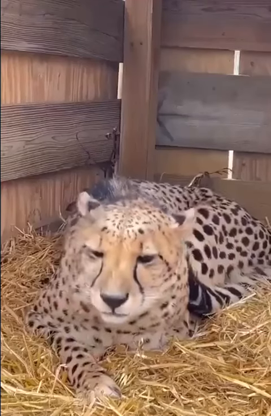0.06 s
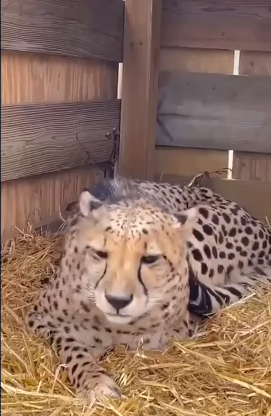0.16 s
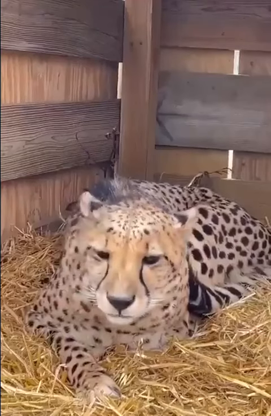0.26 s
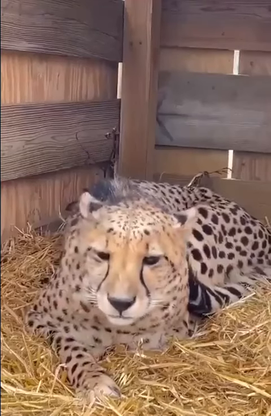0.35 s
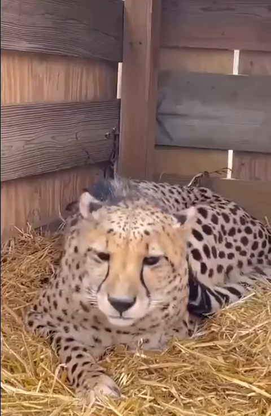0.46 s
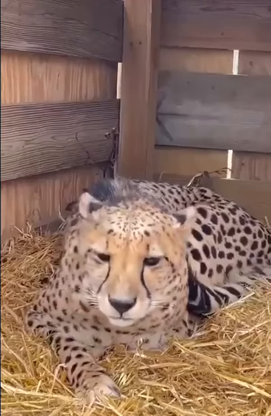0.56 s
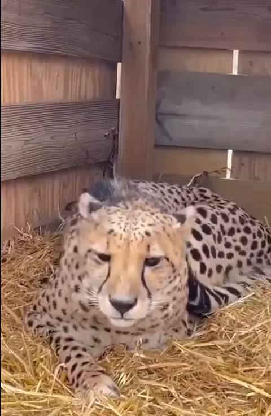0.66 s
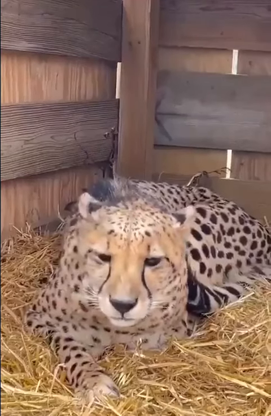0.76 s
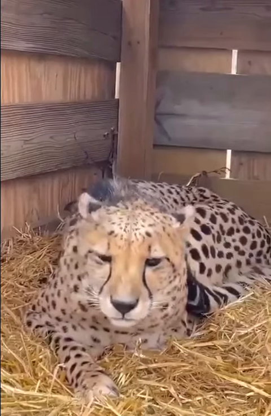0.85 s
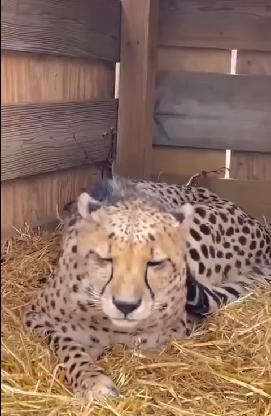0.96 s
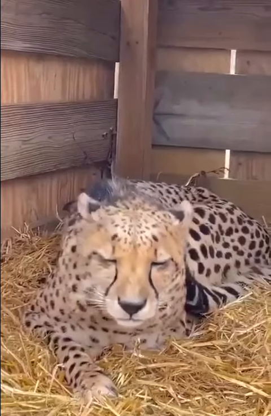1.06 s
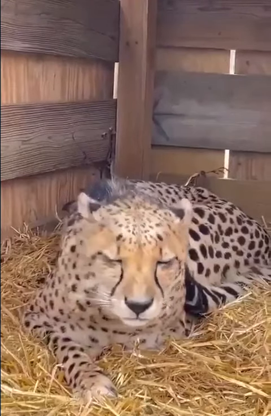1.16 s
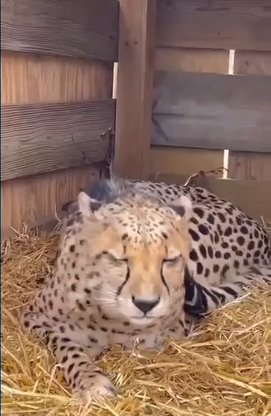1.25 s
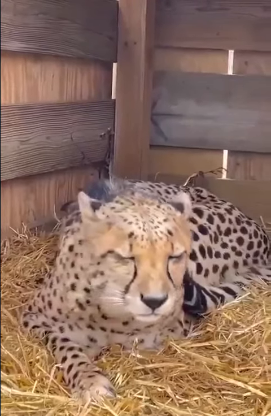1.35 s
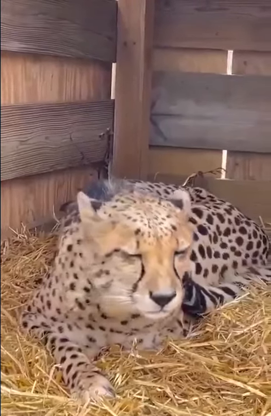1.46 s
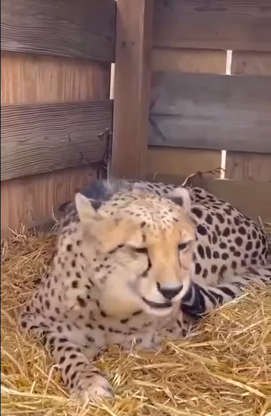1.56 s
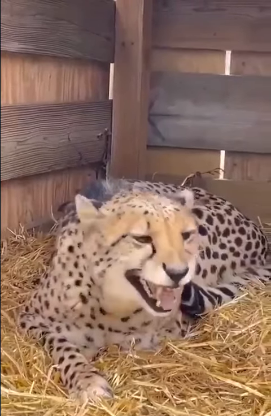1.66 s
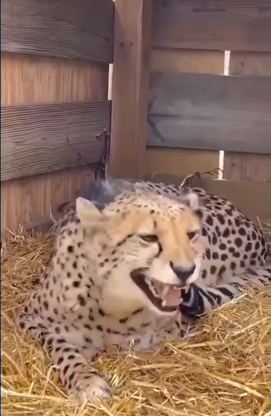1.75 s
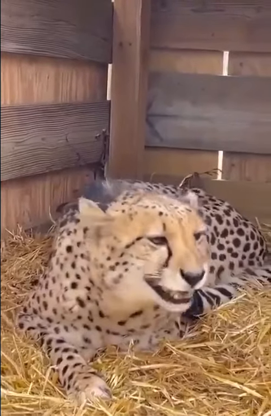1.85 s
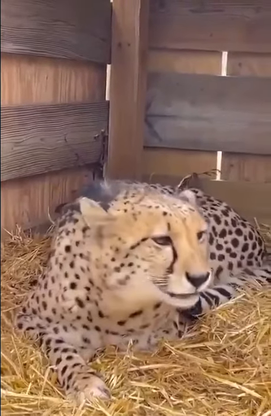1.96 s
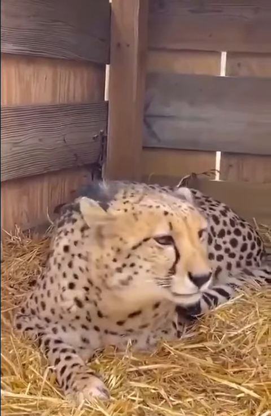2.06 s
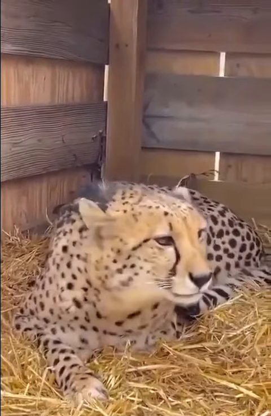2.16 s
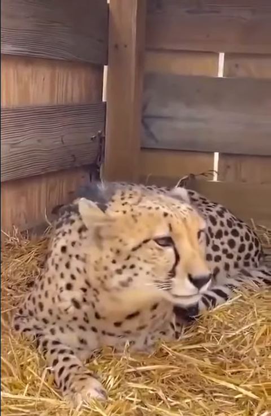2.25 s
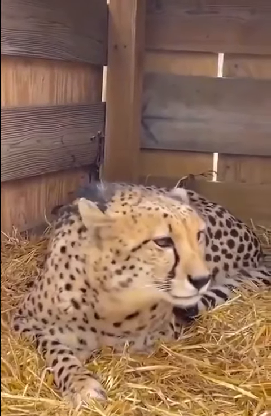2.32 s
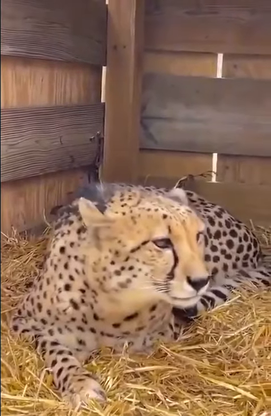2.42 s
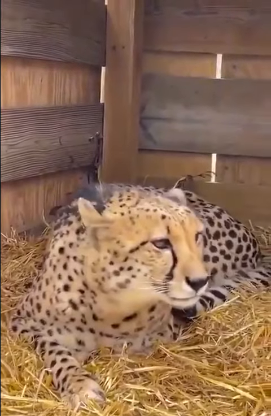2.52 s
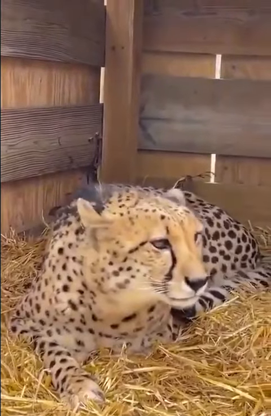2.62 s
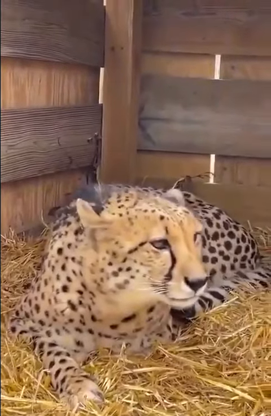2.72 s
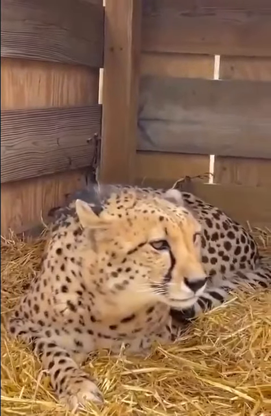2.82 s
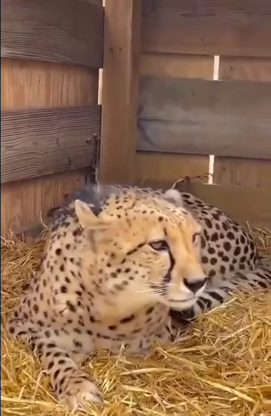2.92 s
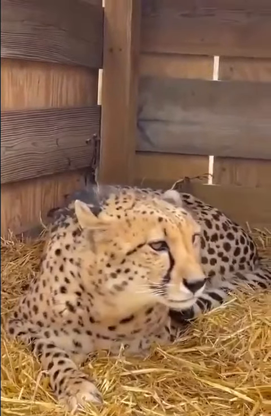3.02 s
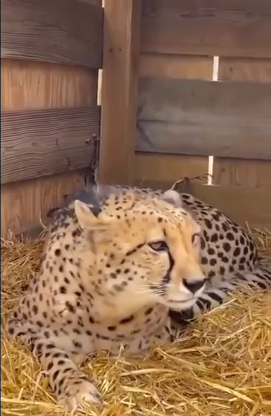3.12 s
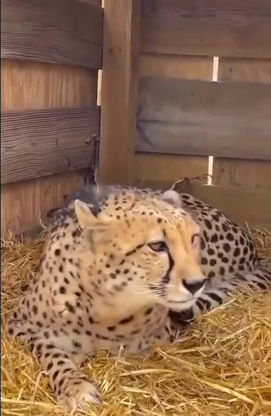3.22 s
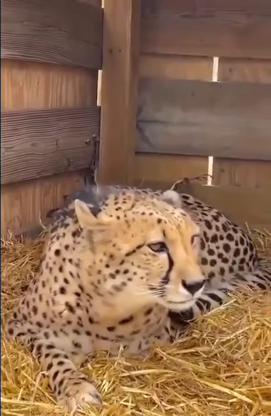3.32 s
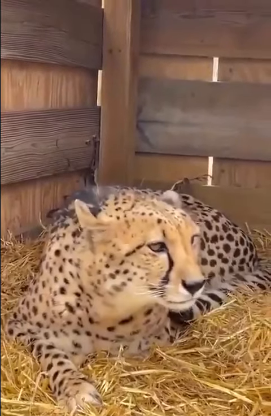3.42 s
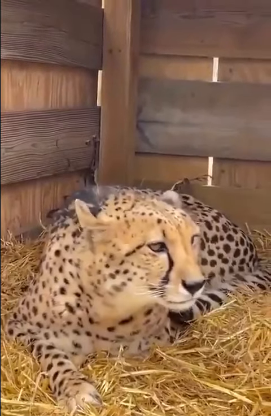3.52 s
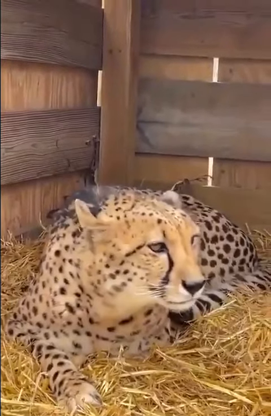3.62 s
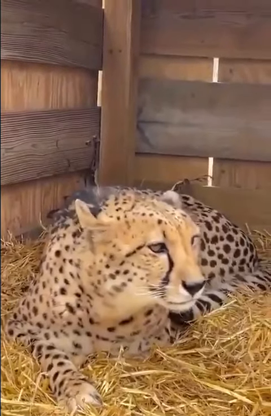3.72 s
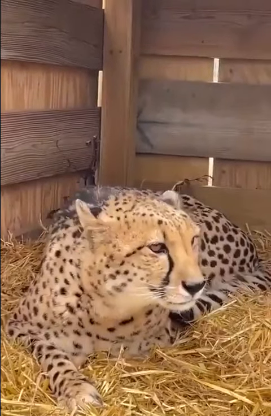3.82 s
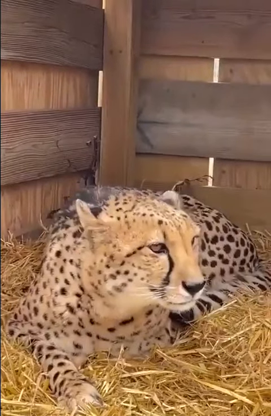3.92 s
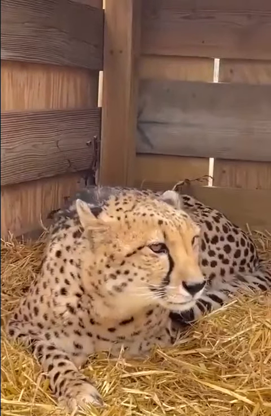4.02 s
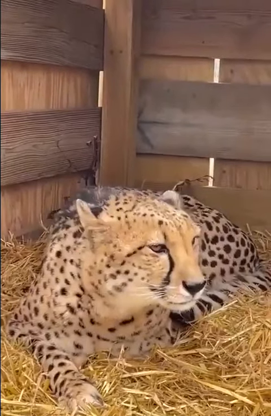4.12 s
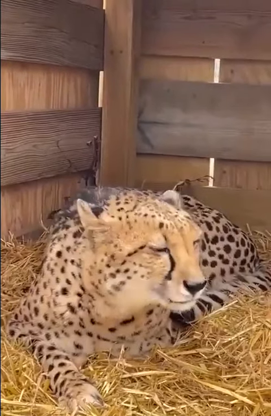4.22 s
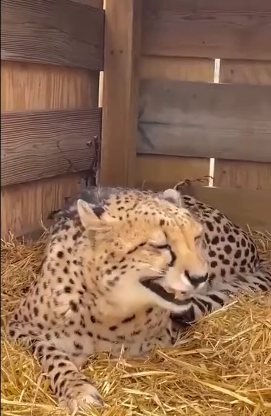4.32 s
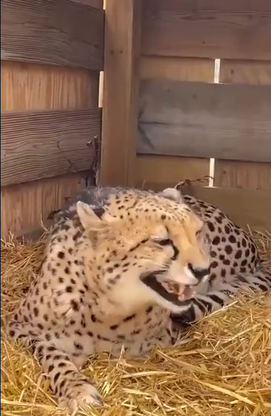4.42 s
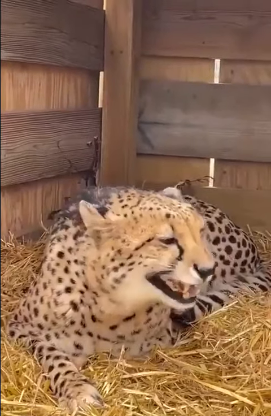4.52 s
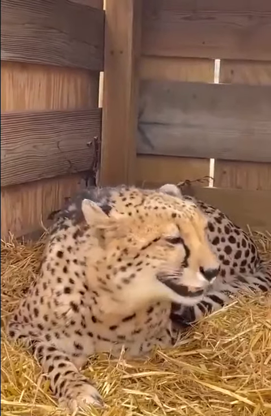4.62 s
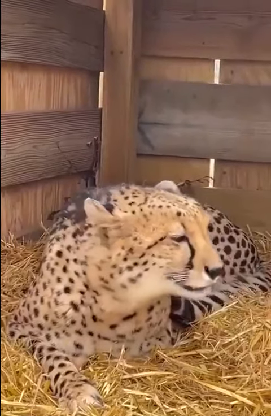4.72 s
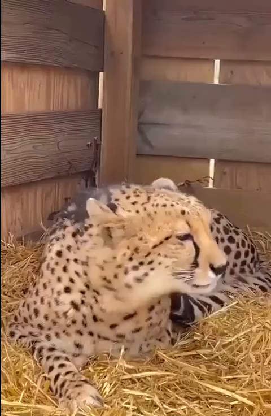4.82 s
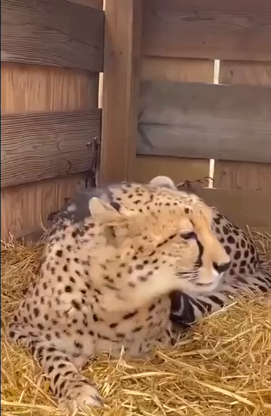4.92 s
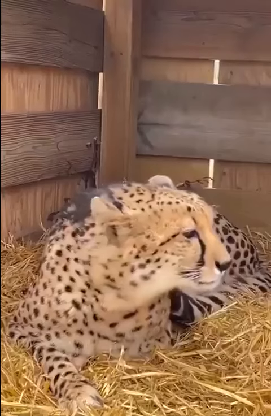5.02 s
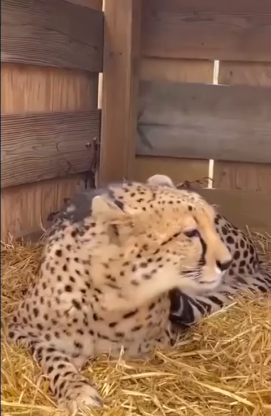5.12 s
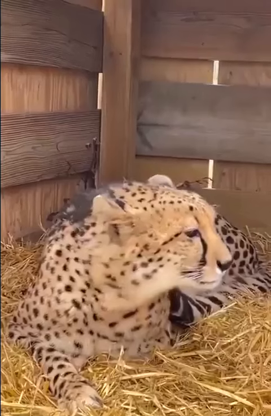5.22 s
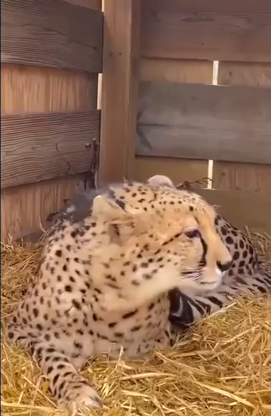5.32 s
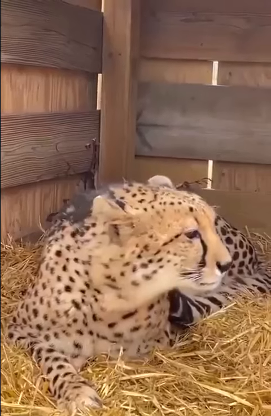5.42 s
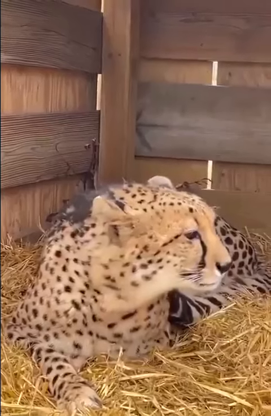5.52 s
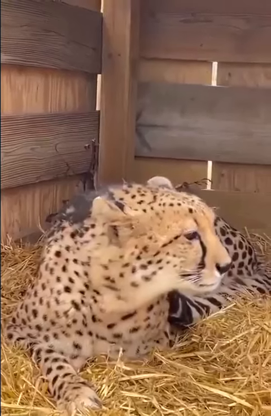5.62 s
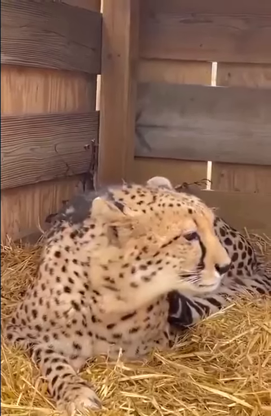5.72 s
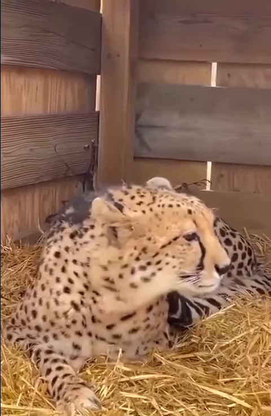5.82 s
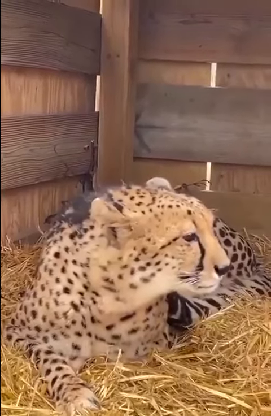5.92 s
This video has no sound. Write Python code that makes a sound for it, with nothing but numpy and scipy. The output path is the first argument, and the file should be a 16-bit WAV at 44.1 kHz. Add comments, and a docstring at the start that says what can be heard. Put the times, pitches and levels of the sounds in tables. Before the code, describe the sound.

A cheetah close to the microphone in a wooden pen calls twice, a few seconds apart. Both calls are high chirps that rise slightly and glide downward; the first is raspy and cracks, the second is longer and ends in a low hum. Behind it, the low drone of a small engine gradually winds down into soft, separate putts, with a few very faint straw crackles.

```python
"""Outside a wooden pen, a low rumble like a single-cylinder engine comes off the throttle and slows.
At 1.5 s a cheetah lying on straw inside gives a high chirp that arches and slides down: a nearly pure
harmonic voice with a raspy start and a low closing note, coloured by the throat and the boards.
Near 3.6 s a soft whoosh passes and the engine thins into single putts. A thin hiss leads to a second,
longer chirp at 4.1 s; then the engine putts on at idle."""
import sys
import numpy as np
from scipy import signal
from scipy.fft import rfft, irfft
from scipy.io import wavfile
from scipy.ndimage import uniform_filter1d

SR = 44100
rng = np.random.default_rng(int(sys.argv[2]) if len(sys.argv) > 2 else 0)


def pcm_store(signal):
    """Save signal as 16-bit PCM."""
    levels = np.round(np.clip(np.atleast_2d(signal), -1, 1) * 32767)
    wavfile.write(sys.argv[1], SR, levels.astype(np.int16).T)


N = 263277
T = np.arange(N) / SR
TOP_HZ = 11900  # ceiling of the overtones and the mix


def undb(db):
    """Decibels to gain."""
    return 10 ** (np.asarray(db) / 20)


def unit(x):
    """Scale to rms 1."""
    return x / np.sqrt(np.mean(x ** 2))


def curves(table):
    """Envelopes from a table's columns, joined by straight lines in time."""
    times, *columns = np.transpose(table)
    return [np.interp(T, times, column) for column in columns]


def bell(at_s, width_s):
    """A smooth bump of height 1 around a moment."""
    return np.exp(-((T - at_s) / width_s) ** 2)


def ramp(start_s, length_s):
    """A straight fade from 0 to 1."""
    return np.clip((T - start_s) / length_s, 0, 1)


def swells(table):
    """Gain envelope of rounded swells: (time [s], level [dB], rise [s], fall [s])."""
    return sum(undb(db) * bell(s, np.where(T < s, rise_s, fall_s)) for s, db, rise_s, fall_s in table)


def response(hz, eq):
    """Gain of an EQ curve at the given frequencies."""
    points_hz, db = np.transpose(eq)
    return undb(np.interp(np.log(np.maximum(hz, 1)), np.log(points_hz), db))


def equalise(x, eq):
    """Pass x through an EQ curve."""
    return irfft(rfft(x) * response(np.fft.rfftfreq(N, 1 / SR), eq), N)


def butter(x, order, hz, kind):
    """Pass x through a Butterworth filter."""
    return signal.sosfilt(signal.butter(order, hz, kind, fs=SR, output="sos"), x)


def noise(eq):
    """Coloured noise of rms 1."""
    return unit(equalise(rng.standard_normal(N), eq))


def walk(per_s):
    """Smoothed sample-and-hold modulation with a spread near 1."""
    hold = max(int(SR / per_s), 1)
    held = np.repeat(rng.standard_normal(N // hold + 1), hold)
    return 1.4 * uniform_filter1d(uniform_filter1d(held, hold), hold)[:N]


def stereo(mid, side):
    """Mid and side to left and right."""
    return np.array([mid + side, mid - side])


def echoes(x, t60_s, delay_s):
    """Dense reflections that start after a pre-delay and die away."""
    t = T[:SR]
    tail = rng.standard_normal(SR) * undb(-60 * t / t60_s) * (t > delay_s)
    return signal.fftconvolve(x, tail / np.sqrt(np.sum(tail ** 2)))[:N]


# bass-heavy outdoor bed: (frequency [Hz], gain [dB])
AIR_EQ = [(22, 1.5), (45, 25.5), (70, 28), (110, 23.5), (150, 20.5), (240, 8.5), (330, 1.5), (600, -10),
          (1300, -13), (2200, -16), (4000, -21), (7600, -21), (8400, -31), (12000, -33.5)]
def air(level_db=-55, side_db=-16):
    """Quiet outdoor ambience, mono in the bass."""
    side = undb(side_db) * butter(noise(AIR_EQ), 4, 450, "highpass")
    return stereo(noise(AIR_EQ), side) * undb(level_db + .46 * walk(26))


# swell of the whoosh: (time [s], level [dB], rise [s], fall [s])
WHOOSH_SWELL = [(3.58, -75.5, .4, 0.347)]
# its dull tone: (frequency [Hz], gain [dB])
WHOOSH_EQ = [(150, 3.5), (400, 5.5), (700, -10.5), (1000, -2.5), (1350, 2), (1900, -11.5), (3000, -22),
             (8000, -47)]
def whoosh():
    """Something passes softly in the distance."""
    return noise(WHOOSH_EQ) * swells(WHOOSH_SWELL)


# fade of the rolling noise: (time [s], level [dB])
ROLL_LEVEL = [(0, -47.5), (.8, -54), (1.9, -55.5), (2.35, -66.5), (3.1, -74), (4.1, -86)]
# its low-mid body: (frequency [Hz], gain [dB])
ROLL_EQ = [(40, -0.5), (150, 4), (260, 3), (350, 5.5), (480, -0.5), (650, -11), (1100, -11), (1600, -13.5),
           (2000, -16.5), (2500, -18), (4000, -32.5), (5500, -31.5), (7600, -35.5), (8300, -51),
           (11000, -45.5), (13000, -62)]
def rolling(waver_db=1, side_db=-14):
    """Tyre and machine noise fades as the vehicle slows."""
    roll_db, = curves(ROLL_LEVEL)
    side = undb(side_db) * butter(noise(ROLL_EQ), 4, [480, 2000], "bandpass")
    return stereo(noise(ROLL_EQ), side) * undb(roll_db + waver_db * walk(10))


# drone envelope, ahead of the pipe: (time [s], level [dB])
DRONE_LEVEL = [(0, -38.5), (.35, -46), (.63, -37.5), (.705, -30), (1.05, -28), (1.75, -31), (2.3, -29.5),
               (3.17, -38.5), (3.35, -45), (3.85, -47), (4.3, -64.5)]
# engine orders: (multiple of the firing rate, gain [dB])
ENGINE_ORDERS = [(1, -22), (2, -11.5), (3, -1.5), (4, 1.5), (5, -1.5), (6, -7), (7, -15.5), (8, -10.5),
                 (9, -8.5), (10, -10.5), (11, -15), (12, -10), (13, -18)]
# exhaust pipe resonances: (frequency [Hz], gain [dB])
PIPE_EQ = [(20, -21.5), (46, -4.5), (60, -8.5), (72, -2.5), (90, 2), (112, 0.5), (146, 0), (165, -13),
           (185, -16), (225, -11.5), (300, -22), (500, -28)]
# the exhaust's bark under throttle: (frequency [Hz], gain [dB])
BARK_EQ = [(30, -8), (70, -5), (110, -4.5), (145, 0), (180, -5.5), (215, 10.5), (260, -11.5), (400, -24.5),
           (500, -21)]
def exhaust_drone(rate, cycles, miss_db, stumble_cycles=.005, smear_rad=1.3):
    """Harmonics of the firing rate sound through the pipe; the bark drops as the throttle shuts."""
    drone_db, = curves(DRONE_LEVEL)
    tail_s = np.maximum(T - DRONE_LEVEL[-1][0], 0)
    drone_gain = undb(drone_db - miss_db - 5 * tail_s)  # the tail fades 5 dB/s
    throttle_shut = ramp(start_s=.39, length_s=.3)
    bark_gain = undb(-38.5 - 10 * throttle_shut - 8 * T - miss_db / 2)
    lope_db = 3 - 23 * bell(at_s=2.38, width_s=.34)  # odd orders lope, except for one smooth spell
    # no two firings are quite alike in timing or strength
    crank = 2 * np.pi * (cycles + stumble_cycles * walk(45))
    throb_db = 1.63 * walk(40)
    drone = np.zeros(N)
    for order, db in ENGINE_ORDERS:
        hz = order * rate
        pipe = drone_gain * response(hz, PIPE_EQ) + bark_gain * response(hz, BARK_EQ)
        strength = undb(db + order % 2 * lope_db + throb_db + 1.12 * walk(7))
        # the silencer delays each order differently, smearing the pulse over the cycle
        drone += pipe * strength * np.cos(order * crank - smear_rad * order ** 2)
    return drone


# thud of one putt: (frequency [Hz], gain [dB])
PUTT_EQ = [(20, -40), (34, -15.5), (55, 0), (72, -2), (95, -1), (135, -13.5), (195, -27), (300, -41.5),
           (500, -60), (2000, -140)]
def exhaust_putts(rate, cycles, miss_db, scatter_db=2):
    """Each firing pushes out one low pulse, softer once the engine idles."""
    firings = np.flatnonzero(np.diff(np.floor(cycles)))
    pulses = np.zeros(N)
    pulses[firings] = undb(scatter_db * rng.standard_normal(len(firings))) / np.sqrt(rate[firings])
    level_db = -42 - 6.5 * ramp(start_s=3.53, length_s=.55) - miss_db / 2
    return unit(equalise(pulses - pulses.mean(), PUTT_EQ)) * undb(level_db)


# the engine winds down: (time [s], firing rate [Hz])
FIRING_RATE = [(0, 36.4), (.36, 35), (.55, 32.6), (.7, 31.1), (1.01, 28.6), (1.35, 27.1), (1.89, 25.3),
               (2.27, 24), (2.74, 21.9), (3.2, 19.7), (3.6, 17.1), (4, 14.2), (4.5, 12.9), (4.9, 11.3),
               (5.2, 10.9), (5.45, 10.8), (5.55, 10.4), (5.97, 10.3)]
def engine(idle_beat_s=5.035, yard_db=-9):
    """A falling drone misses once, then gives way to single putts that echo in the yard."""
    rate, = curves(FIRING_RATE)
    cycles = np.cumsum(rate) / SR
    cycles -= np.interp(idle_beat_s, T, cycles)  # one firing lands on this beat
    miss_db = 18.5 * bell(at_s=.665, width_s=.019)
    drone = exhaust_drone(rate, cycles, miss_db)
    putts = exhaust_putts(rate, cycles, miss_db)
    return drone + putts + undb(yard_db) * echoes(putts, t60_s=1, delay_s=.012)


# bright bounce off the nearest boards: (frequency [Hz], gain [dB])
BOARDS_EQ = [(400, -32.5), (2000, -22.5), (3000, -7), (4500, 2), (12000, 1.5)]
# stereo width of the pen: (frequency [Hz], gain [dB])
PEN_SIDE_EQ = [(250, -24.5), (600, -13), (1200, -20), (2000, -24.5), (3000, -30.5), (5000, -4), (6500, -8),
               (9000, -22)]
def wooden_pen(cat, foley, reverb_db=-18):
    """Cat and foley sit in the centre; the boards answer briefly, a little differently on each side."""
    direct = cat + foley
    boards = equalise(echoes(cat, t60_s=.07, delay_s=.001), BOARDS_EQ)
    reverb = undb(reverb_db) * echoes(direct, t60_s=.27, delay_s=.003)
    side = equalise(echoes(direct, t60_s=.12, delay_s=.001), PEN_SIDE_EQ)
    return stereo(direct + boards + reverb, side)


# swell of the hiss: (time [s], level [dB], rise [s], fall [s])
HISS_SWELL = [(3.9, -72, .04, 0.078)]
# its narrow treble band: (frequency [Hz], gain [dB])
HISS_EQ = [(7000, -36), (8200, -21.5), (9900, -23), (10600, -1), (11300, 1), (12300, -10), (13000, -35)]
def hiss(flicker_db=2):
    """A thin, very high hiss flickers before the second chirp."""
    return noise(HISS_EQ) * swells(HISS_SWELL) * undb(flicker_db * walk(100))


# foley hits: (time [s], level [dB], centre [Hz], width [Hz], decay [s])
TICK_HITS = [(1.119, -52, 850, 503, 0.0053), (1.438, -67.5, 2000, 2500, .015),
             (1.803, -64.5, 7000, 3980, .02), (1.814, -62, 5030, 6980, .007), (3.13, -79, 2400, 400, .015),
             (3.175, -83, 3310, 500, .012), (4.9, -75.5, 2285, 400, .04), (5.28, -83, 4970, 5000, .04)]
def ticks():
    """A soft knock, straw crackles and a click of the closing mouth: bursts of resonant noise."""
    out = np.zeros(N)
    for at_s, db, hz, width_hz, decay_s in TICK_HITS:
        ring = signal.iirpeak(hz, hz / width_hz, fs=SR)
        burst = signal.lfilter(*ring, signal.lfilter(*ring, rng.standard_normal(N)))
        attack = uniform_filter1d(1. * (T >= at_s), 130)
        out += unit(burst) * undb(db) * attack * np.exp(-np.abs(T - at_s) / decay_s)
    return out


# crack before the first chirp's closing note: (time [s], level [dB], rise [s], fall [s])
CRACK_SWELL = [(1.777, -49, .035, .016)]
# its midrange bite: (frequency [Hz], gain [dB])
CRACK_EQ = [(600, -31.5), (1000, -3.5), (1200, -2.5), (1750, -1), (2100, -22), (3300, -30), (5000, -54.5)]
def voice_crack():
    """For a moment the vocal folds lose their rhythm and only rattle."""
    return noise(CRACK_EQ) * swells(CRACK_SWELL)


# weight of the fundamental against the voice: (pitch [Hz], gain [dB])
FUNDAMENTAL_EQ = [(420, -7), (550, -10), (630, -16), (690, -21), (830, -19)]
# the jaws close to a hum on the fundamental: (time [s], level [dB], rise [s], fall [s])
HUM_SWELLS = [(1.858, -41.5, .015, 0.02), (4.621, -29.5, 0.013, .013), (4.658, -33, 0.0095, 0.022)]
# the voice strains and its overtones flare: (time [s], level [dB], rise [s], fall [s])
STRAIN_SWELLS = [(1.553, -35.5, 0.014, 0.027), (1.603, -31, 0.011, .018), (4.33, -58.5, 0.025, .05),
                 (4.44, -52.5, .03, 0.071)]
# the voice catches and rasps: (time [s], level [dB], rise [s], fall [s])
CATCH_SWELLS = [(1.514, -46.5, .008, 0.021), (1.605, -55.5, .03, .02), (1.678, -42.5, .015, 0.024),
                (4.166, -50, .016, 0.094), (4.24, -55, .02, .025), (4.39, -51, .025, 0.021),
                (4.635, -56.5, 0.039, 0.045)]
# tone of the rasp: (frequency [Hz], gain [dB])
RASP_EQ = [(250, -17.5), (550, -1), (850, -12), (1200, 0), (1900, 3), (2500, -9), (3200, -14),
           (3700, -31.5), (4200, -46), (12000, -67)]
def chirp(contour, throat_eq, ring_partial, ring_db, jitter, flutter_db,
          overtone_db, overtone_growth, rasp_db, hoarse_db, rolloff_hz):
    """Vocal folds sing a harmonic stack; the mouth lifts partial 2 or 3, the throat a higher one."""
    hz, voice_db, mouth_hz = curves(contour)
    gate = uniform_filter1d(1. * ((T > contour[0][0]) & (T < contour[-1][0])), 200)
    on = gate > 1e-6
    # overtones and rasp grow with effort, which is 0 dB at full voice
    effort_db = voice_db + 21
    overtone_gain = undb(overtone_db + overtone_growth * effort_db) + swells(STRAIN_SWELLS)
    rasp_gain = undb(rasp_db + .44 * effort_db) + swells(CATCH_SWELLS)
    # the folds run unevenly where the rasp rivals the voice
    unsteady = 1 + 3 * np.minimum(rasp_gain * undb(14 - voice_db), 1)
    trembling_hz = hz * (1 + jitter * unsteady * walk(500) + .005 * walk(90))
    phase = 2 * np.pi * np.cumsum(trembling_hz) / SR

    k = np.arange(1, 25)[:, None]  # partial numbers
    partial_hz = k * hz[on]
    fundamental = undb(voice_db) * response(hz, FUNDAMENTAL_EQ) + swells(HUM_SWELLS)
    mouth = undb(-12 * ((partial_hz[1:3] - mouth_hz[on]) / 600) ** 2)  # 12 dB down 600 Hz off centre
    upper_hz = partial_hz[3:]
    throat = response(upper_hz, throat_eq) * undb(ring_db * (k[3:] == ring_partial)) * (upper_hz < TOP_HZ)
    rolloff = 1 / np.sqrt(1 + (upper_hz / rolloff_hz) ** 2)
    gains = np.vstack([fundamental[on],
                       undb(voice_db[on]) * mouth / np.linalg.norm(mouth, axis=0),
                       overtone_gain[on] * rolloff * throat / np.linalg.norm(throat, axis=0)])
    # each partial flutters alone, the high ones most
    gains *= undb(flutter_db * np.sqrt(k) * np.array([walk(110)[on] for _ in k]))
    voice = np.zeros(N)
    voice[on] = np.sqrt(2) * np.sum(gains * np.sin(k * phase[on]), axis=0)

    rasp = noise(RASP_EQ) * rasp_gain
    # the top turns hoarse when the voice is pushed
    hoarse = unit(butter(noise(throat_eq), 8, 3900, "highpass"))
    hoarse *= np.sqrt(rasp_gain * overtone_gain) * undb(hoarse_db + .28 * effort_db)
    airflow = 1 + .7 * np.sin(phase)  # air rushes through the folds once a cycle
    return gate * (voice + (rasp + hoarse) * airflow)


# contours of the two calls: (time [s], pitch [Hz], level [dB], mouth resonance [Hz])
FIRST_CALL = [(1.504, 762.7, -54.5, 1600), (1.515, 774.8, -36.5, 1560), (1.531, 740, -32.5, 1800),
              (1.559, 816, -30, 1760), (1.594, 815, -26, 1629), (1.616, 734, -28, 1595),
              (1.637, 669, -16.5, 1610), (1.657, 621, -16.5, 1480), (1.7, 562, -24.5, 1340),
              (1.76, 572, -53.5, 1480), (1.795, 679.6, -44, 1230), (1.833, 665, -40.5, 1170),
              (1.856, 564, -48, 1480), (1.895, 537, -70, 1295)]
SECOND_CALL = [(4.148, 552, -45.5, 1000), (4.19, 558.4, -29, 1413), (4.24, 646.4, -25.5, 1375),
               (4.303, 690, -22.5, 1738), (4.35, 659.2, -18.5, 1620), (4.41, 590, -21.5, 1400),
               (4.456, 554, -21.5, 1530), (4.52, 537.5, -25, 1464), (4.603, 499, -38.5, 945),
               (4.636, 428, -47, 1480), (4.665, 412.4, -49.5, 1420), (4.72, 412, -83, 1450)]
# tone of the upper overtones in each chirp: (frequency [Hz], gain [dB])
FIRST_CALL_EQ = [(1700, -3.5), (2700, -4), (3150, 11), (3550, -12.5), (3800, -29), (4150, -12.5),
                 (4700, -5), (5400, -28.5), (6100, -18), (6650, -38), (7400, -27.5), (8200, -42),
                 (10700, -27.5), (12000, -51)]
SECOND_CALL_EQ = [(1700, 1), (2300, 9.5), (2750, 7), (3350, -4), (3800, -23), (4700, -9.5), (5000, -26.5),
                  (5600, -5.5), (6700, -16.5), (7600, -24.5), (8200, -47.5), (9000, -38.5), (10800, -31),
                  (12000, -49.5)]
def cheetah():
    """A short, raspy chirp that cracks, then a longer, cleaner one."""
    first = chirp(FIRST_CALL, FIRST_CALL_EQ, ring_partial=6, ring_db=1, jitter=.004, flutter_db=.4,
                  overtone_db=-49.5, overtone_growth=1.4, rasp_db=-54.5, hoarse_db=-9, rolloff_hz=9006)
    second = chirp(SECOND_CALL, SECOND_CALL_EQ, ring_partial=5, ring_db=7, jitter=.002, flutter_db=1.34,
                   overtone_db=-47, overtone_growth=1.3, rasp_db=-67, hoarse_db=-12, rolloff_hz=8020)
    return first + second + voice_crack()


def scene():
    """The cheetah up front in its pen, over the vehicle and the outdoor bed."""
    return wooden_pen(cheetah(), hiss() + ticks()) + engine() + rolling() + whoosh() + air()


def record(dry):
    """Master: 8 ms fades at both ends, a sub-bass cut and a steep top cut."""
    edge_s = np.minimum(T, T[-1] - T)
    fade = np.sin(np.pi / 2 * np.minimum(edge_s / .008, 1)) ** 2
    top_cut = signal.ellip(8, .2, 70, TOP_HZ, fs=SR, output="sos")
    return signal.sosfilt(top_cut, butter(dry * fade, 2, 20, "highpass"))


dry = scene()
out = record(dry)
pcm_store(out)
```